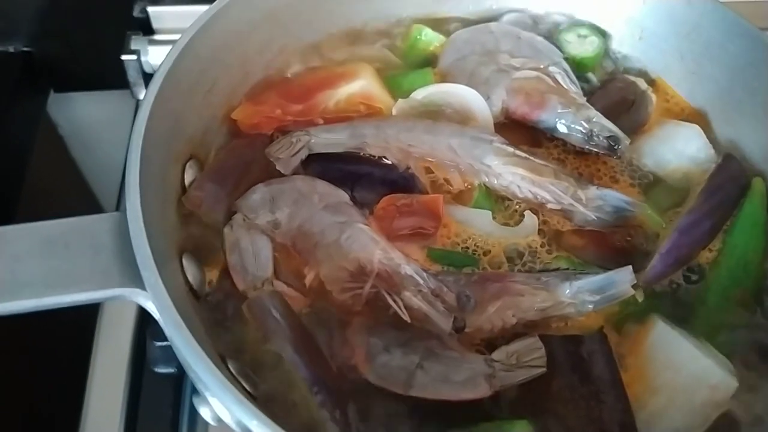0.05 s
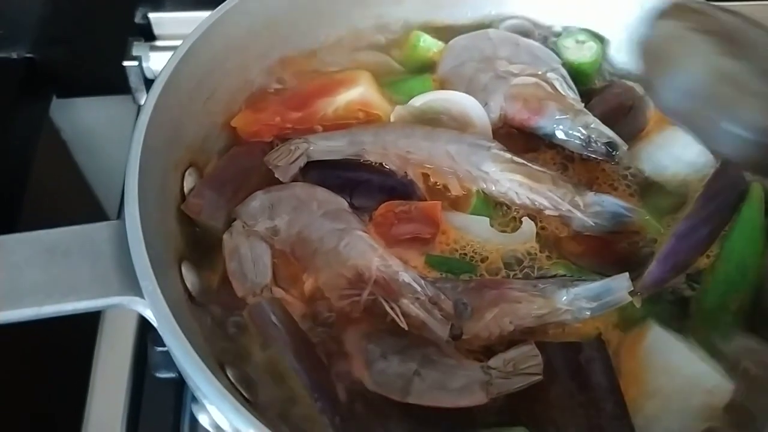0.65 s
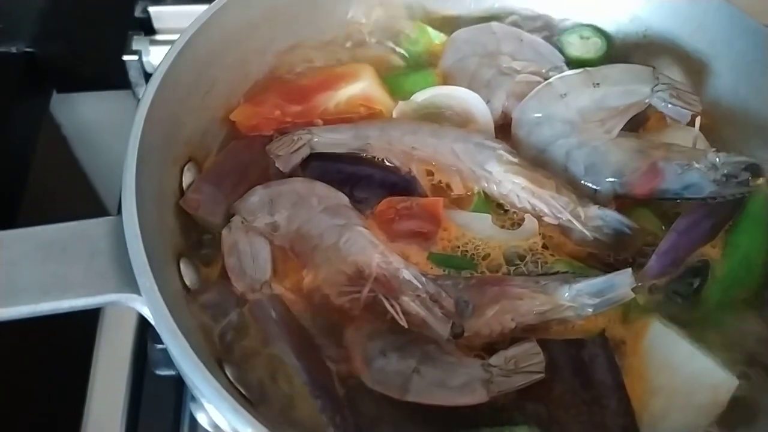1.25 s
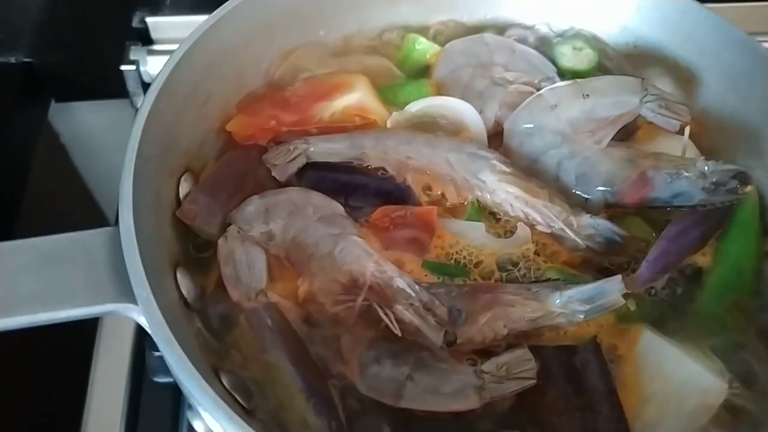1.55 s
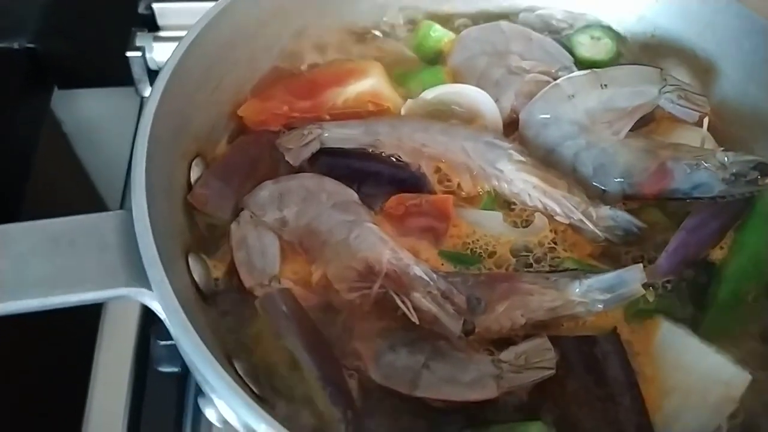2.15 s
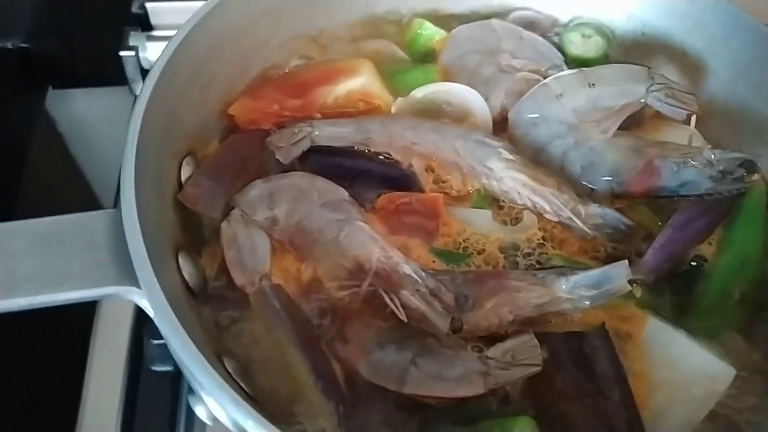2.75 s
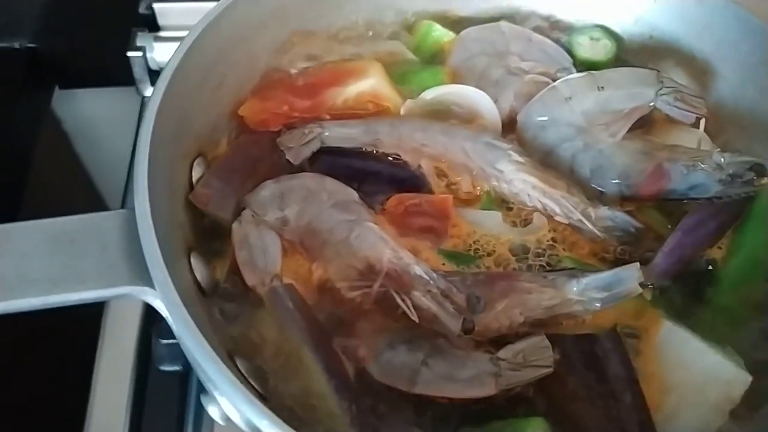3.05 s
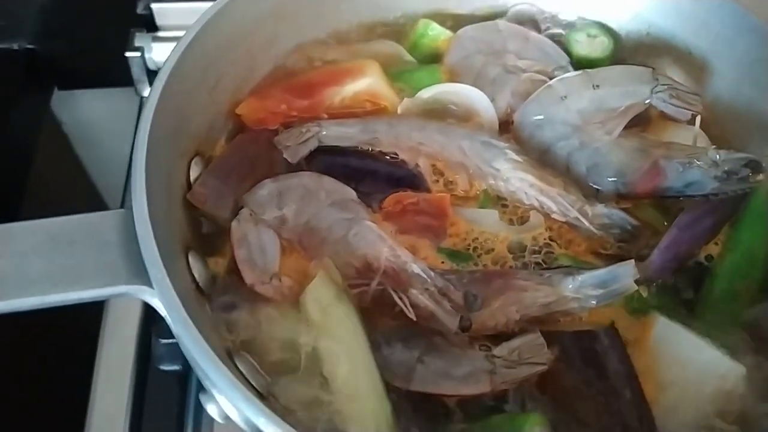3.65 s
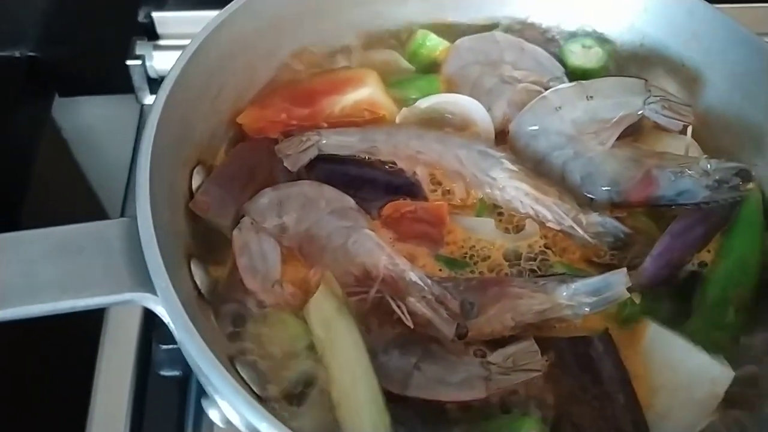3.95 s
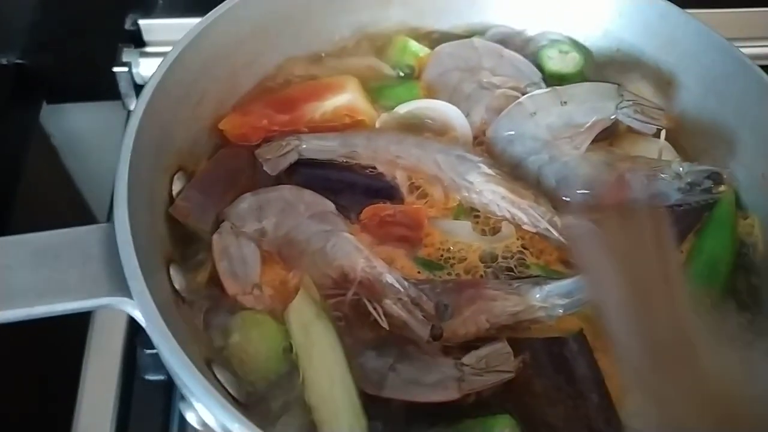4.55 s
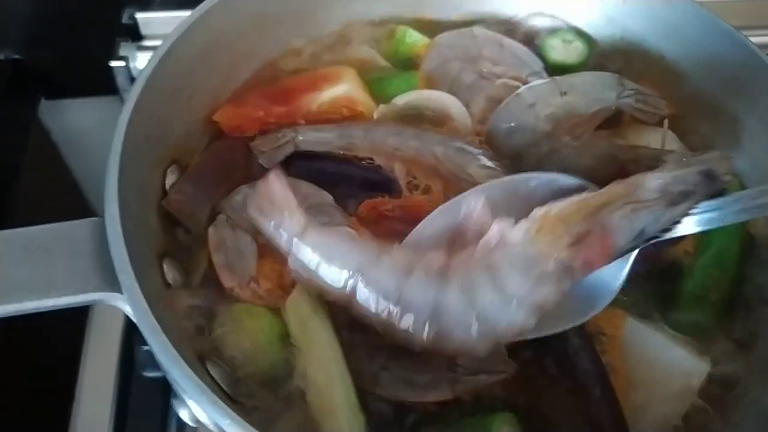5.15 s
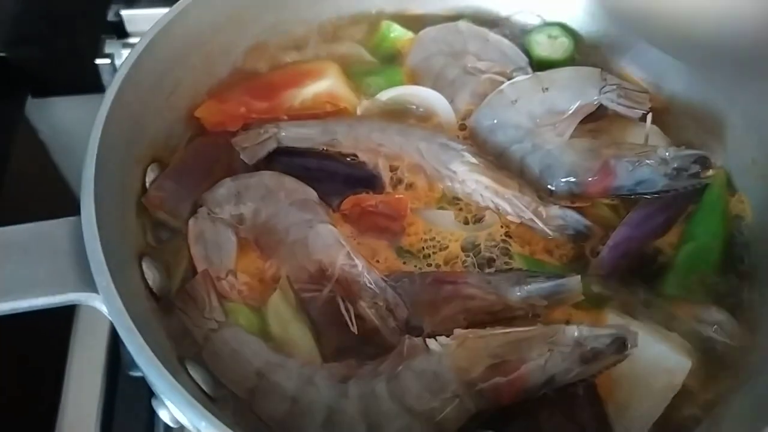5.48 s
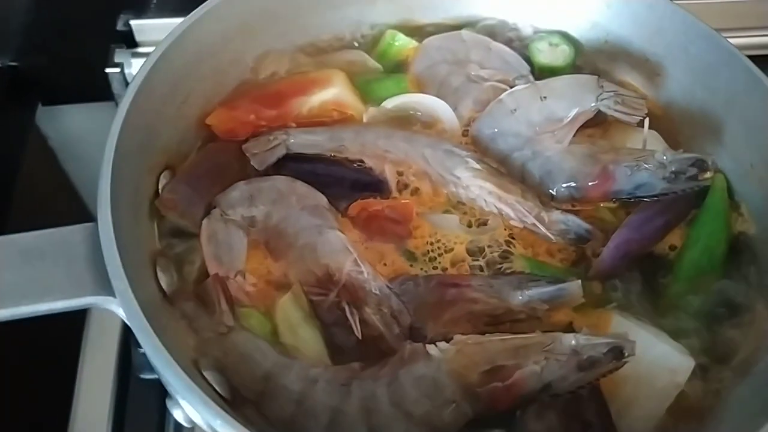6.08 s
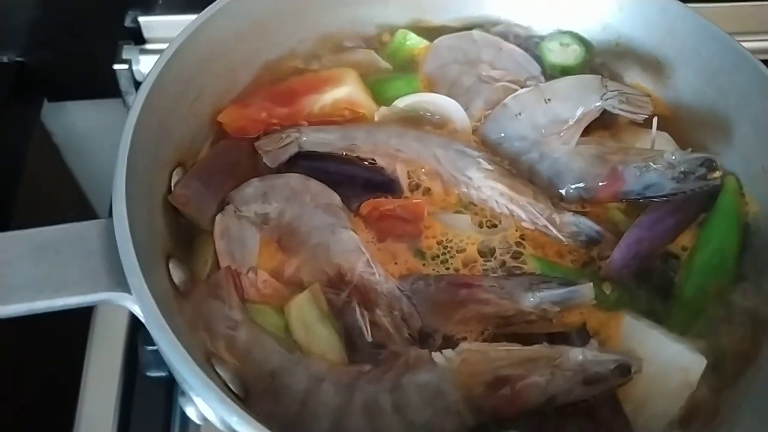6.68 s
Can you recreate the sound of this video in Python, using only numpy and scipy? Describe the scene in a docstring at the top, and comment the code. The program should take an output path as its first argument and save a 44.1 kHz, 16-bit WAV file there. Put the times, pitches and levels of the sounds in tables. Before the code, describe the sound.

Soup simmers and plops in a metal pot while a metal spoon briefly knocks, scrapes and squeaks against it.

```python
"""Soup seethes in a metal pot on a stove, bubbles plopping over a fine fizz of foam.
Each bubble rings as its film tears. A metal spoon scrapes, knocks and squeaks on the pot,
setting the metal ringing, and a small kitchen answers faintly behind the close sound.
The left microphone hears nearly everything; the right is muffled and rumbles in the moving air."""
import sys
import numpy as np
from scipy import signal
from scipy.fft import rfft, irfft, next_fast_len
from scipy.io import wavfile
from scipy.ndimage import uniform_filter1d

SR = 44100
rng = np.random.default_rng(int(sys.argv[2]) if len(sys.argv) > 2 else 0)


def bounce(signal):
    """Save signal as a 16-bit WAV file at the path given by the first command-line argument."""
    frames = np.transpose(np.atleast_2d(signal))
    limited = np.clip(frames, -1, 1)
    pcm = np.round(limited * 32767).astype(np.int16)
    wavfile.write(sys.argv[1], SR, pcm)


N = 305172


def amp(db):
    """Decibels to gain."""
    return 10 ** (np.asarray(db) / 20)


def unit(x):
    """Scales to rms 1."""
    return x / np.sqrt(np.mean(x ** 2) + 1e-20)


def read(points, hz):
    """Reads a table along a log-frequency axis."""
    f, value = np.transpose(points)
    return np.interp(np.log(hz + 1), np.log(f + 1), value)


def add(mix, s, sound):
    """Mixes a sound in at s seconds."""
    part = mix[max(round(s * SR), 0):][:len(sound)]
    part += sound[:len(part)]


def excite(hits, response):
    """Every hit sets off the same response."""
    return signal.oaconvolve(hits, response)[:N]


def colour(x, spectrum):
    """Filters by a table of (Hz, dB)."""
    size = next_fast_len(len(x))
    gain = amp(read(spectrum, np.fft.rfftfreq(size, 1 / SR)))
    return irfft(rfft(x, size) * gain, size)[:len(x)]


def noise(spectrum, size=N):
    """Coloured noise of rms 1."""
    return unit(colour(rng.standard_normal(size), spectrum))


def drift(per_s):
    """Slow random wandering of rms 1."""
    knots = rng.standard_normal(2000)
    return unit(np.interp(np.arange(N) / SR * per_s, np.arange(len(knots)), knots))


def clicks(per_s, spread_db):
    """Random impulses: many small, a few large."""
    chance = rng.random(N) * SR / per_s
    signs = rng.integers(0, 2, N) * 2 - 1
    hit = chance < 1
    out = np.zeros(N)
    out[hit] = signs[hit] * amp(spread_db * np.minimum(-np.log(chance[hit]), 4))
    return out


# The steady bed at the stove. Each row: frequency in Hz, relative density in dB.
SEETHE_SPECTRUM = [(20, 8.5), (100, -7.5), (135, -5.5), (230, 2.5), (340, -9), (530, -11.5), (730, -4.5),
                   (900, -13), (1180, -13.5), (1650, -12), (1870, -8.5), (2050, -18), (3300, -25),
                   (7000, -23.5), (10500, -53), (14000, -44)]
def seethe(level_db=-49, waver_db=1.36):
    """Pot and stove seethe at a gently wavering level."""
    return noise(SEETHE_SPECTRUM) * amp(level_db + waver_db * drift(per_s=15))


# Air at the right microphone. Each row: frequency in Hz, relative density in dB.
DRAUGHT_SPECTRUM = [(10, 1), (22, -2), (45, -7), (100, -21), (125, -27), (170, -31.5), (320, -44),
                    (750, -51.5), (1500, -57), (2700, -59.5), (4000, -65), (8500, -66.5), (15000, -76.5)]
def draught(level_db=-36):
    """Moving air rumbles on the microphone."""
    return amp(level_db) * noise(DRAUGHT_SPECTRUM)


def bubble(hz, cycles, rise):
    """The cavity under a torn film rings a few cycles, rising in pitch as the hole widens."""
    age = np.arange(3000) / SR * hz / cycles
    turns = cycles * (age + rise * (age - 1 + np.exp(-age)))
    wave = np.sin(2 * np.pi * turns) * np.exp(-age) * (1 - np.exp(-age / 0.11))
    return wave / abs(wave).max()


def simmer(level_db=-58, per_s=380, build_db_per_s=0.8):
    """Small, quickly damped bubbles murmur across the surface, louder as the soup heats."""
    pitches = np.geomspace(560, 2300, num=28)
    murmur = np.zeros(N)
    for hz in pitches:
        pops = clicks(per_s / len(pitches), spread_db=2.5)
        murmur += excite(pops, bubble(hz, cycles=2.3, rise=0.085))
    heat_db = build_db_per_s * (np.arange(N) - N / 2) / SR
    tone = [(300, 9.5), (550, -14), (750, -2.5), (1100, 6.5), (1800, -8), (2500, 5.5), (6000, -20)]
    return amp(level_db + heat_db) * unit(colour(murmur, tone))


# Foam at the pot's hot wall. Each row: frequency in Hz, relative density in dB.
FOAM_SPECTRUM = [(2000, -1), (4000, -3.5), (6700, -12), (7100, -1.5), (7600, -4.5), (9000, 2), (10800, 3.5),
                 (12500, -5.5), (14300, -12.5), (15500, -7.5)]
# Droplets on that wall. Each row: start in seconds, relative level in dB.
DROPLET_SPITS = [(0.8032, -41.5), (0.8942, -42.5), (1.3093, -45), (1.839, -42.5), (1.9343, -46),
                 (3.526, -44), (3.549, -44), (3.82, -43), (4.042, -44), (4.114, -45), (5.453, -42),
                 (6.0981, -38)]
def fizz(level_db=-57, clump_db=1.05, spit_db=1, spit_t60=0.03):
    """Foam fizzes in clumps at the hot wall, and now and then spits a droplet."""
    t = np.arange(600) / SR
    foam = unit(colour(clicks(per_s=3500, spread_db=3.2), FOAM_SPECTRUM))
    out = foam * amp(level_db + 0.77 * drift(per_s=8.3) + clump_db * drift(per_s=110))
    for s, db in DROPLET_SPITS:
        add(out, s, amp(db + spit_db - 60 * t / spit_t60) * noise(FOAM_SPECTRUM, len(t)))
    return out


def crackle(level_db=-62, per_s=110):
    """The larger cells of the foam break one by one, each with a tiny high ping."""
    pitches = np.geomspace(7200, 11800, num=10)
    pings = np.zeros(N)
    for hz in pitches:
        breaks = clicks(per_s / len(pitches), spread_db=4)
        pings += excite(breaks, pot_walls(bubble(hz, cycles=2.2, rise=0.048)))
    return amp(level_db) * unit(pings)


def pot_walls(x, echo=0.3, scatter_db=-7.5, t60=0.027):
    """Sound from one place on the soup bounces around the pot and off a surface near it."""
    t = np.arange(3000) / SR
    taps = rng.standard_normal(len(t)) * amp(-60 * t / t60) * (t > .001)
    taps *= amp(scatter_db) / np.linalg.norm(taps)
    taps[0] += 1  # straight to the microphone
    add(taps, rng.uniform(0.00701, 0.0072), [echo])
    return excite(x, taps)


def burst(hz, film_db, snap_db=16, snap_hz=1800, tear_s=.003, trail_db=-16, trail_s=0.012):
    """The wet film tears in three quick snaps, the cavity rings, and two small neighbours follow."""
    sound = bubble(hz, cycles=2.55, rise=0.084)
    snap = amp(film_db + snap_db) * bubble(snap_hz, cycles=1.04, rise=0)
    for k in range(3):
        add(sound, tear_s * k * rng.uniform(0.484, 1) / 2, snap / (1 + k / 2))
    for when, higher in rng.random((2, 2)):
        neighbour = bubble(hz * (1 + higher / 2), cycles=1.4, rise=0.15)
        add(sound, when * trail_s, amp(trail_db) * neighbour)
    wet_lowpass = signal.butter(3, 3300, fs=SR)
    return pot_walls(signal.lfilter(*wet_lowpass, sound))


# Large bubbles on the soup's surface. Each row: start in seconds, relative level in dB,
# nominal pitch in Hz, relative strength of the film's snap in dB.
LARGE_BUBBLES = [(0.083, -45.5, 2800, -15), (0.129, -43, 1140, -17), (0.152, -47, 696, -30),
                 (0.287, -45, 2430, -15), (0.439, -38.5, 1300, -22), (0.61, -47, 1110, -10),
                 (0.622, -45, 820, -23), (0.644, -46.5, 670, -12), (0.664, -47, 660, -22),
                 (0.733, -46.5, 1000, -28), (0.881, -42, 1270, -28), (0.933, -42, 1210, -12.5),
                 (1.113, -40, 1740, -14), (1.3323, -36.5, 1160, -20), (1.526, -43.5, 610, -29),
                 (1.674, -36, 1270, -12), (1.7949, -40.5, 1280, -29), (1.912, -45, 1100, -22),
                 (1.964, -44, 1140, -26), (2.02, -41, 773, -22), (2.164, -42.5, 2370, -25),
                 (2.205, -38.5, 607, -29), (3.031, -38, 1700, -25), (3.062, -38, 1780, -15),
                 (3.2, -44.5, 724, -14), (3.326, -38.5, 1720, -13), (3.363, -42, 716, -10.5),
                 (3.853, -46, 856, -22), (4.012, -35.5, 1110, -32), (4.101, -38.5, 635, -11.5),
                 (4.125, -41, 700, -14), (4.396, -41.5, 850, -35), (4.459, -42, 1340, -23),
                 (4.628, -39.5, 680, -16), (4.774, -40.5, 787, -22), (4.92, -45.5, 1110, -28),
                 (5.066, -44, 1600, -15), (5.073, -37.5, 774, -22), (5.113, -41.5, 1100, -18),
                 (5.128, -38.5, 1180, -27), (5.154, -44, 1700, -22), (5.242, -42.5, 1410, -13.5),
                 (5.32, -34, 1530, -16.5), (5.481, -35, 1040, -16.5), (5.512, -46.5, 1400, -10.5),
                 (5.74, -37.5, 1110, -10), (5.954, -43, 1400, -11), (6.46, -45, 1500, -17),
                 (6.569, -36, 740, -29), (6.799, -42, 1150, -17)]
def plops(level_db=4.5, start_pitch=0.96, lag_s=0.001025):
    """Single large bubbles burst; each starts a little under its pitch and rises through it."""
    out = np.zeros(N)
    for s, db, hz, film_db in LARGE_BUBBLES:
        add(out, s + lag_s, amp(db + level_db) * burst(hz * start_pitch, film_db))
    return out


# Steam down under the food. Each row: start in seconds, peak level in dB, starting pitch in Hz.
STEAM_POCKETS = [(.615, -42, 208), (0.651, -46, 258), (1.53, -47.5, 272), (4.106, -46.5, 218)]
def gulps():
    """Big pockets of steam gulp: deep, slow bubbles with no film to snap."""
    out = np.zeros(N)
    for s, db, hz in STEAM_POCKETS:
        add(out, s, amp(db) * bubble(hz, cycles=7.3, rise=0.12))
    return out


# The metal of spoon and pot. Each row: frequency in Hz, t60 in seconds before t60_factor,
# then relative level in dB when struck at spot 0, at spot 1 and at spot 2.
METAL_MODES = [(162.6, 0.95, -14, -18.5, -30), (212.8, 0.44, -13, -17, -19), (757, 0.12, 8.5, -5, -3),
               (946, 0.069, -8, -14, -3), (1190, 0.045, -12, 1.5, 6.5), (1365, 0.029, -22, -10, 14),
               (1635, 0.067, -3, -7, -6), (1840, 0.057, -10, -14, -6), (2456, 0.061, -15, -9.5, -9.5),
               (2813, 0.079, 2, -40, -36), (3000, 0.065, -40, 2.5, -40), (3200, 0.19, -45, -37, -13.5),
               (3850, 0.065, -10, -3, -32), (4030, 0.089, -7, -18, -10), (4200, 0.037, 2, -3, -30),
               (4867, 0.059, -13, 4, -15), (5310, 0.065, -7, -1, -17), (5600, .07, -16, -5, -28),
               (6050, 0.049, 1, 10, -18), (6240, 0.14, -35, -16, -17), (6500, 0.08, -7, -1, -10),
               (7220, 0.036, 3.5, 10.5, -22), (7450, 0.044, -2, 6, -16), (7760, 0.052, 7.5, 8.5, -14),
               (8295, 0.062, 8, 9.5, 7.5), (8500, 0.089, -1, 10, -22), (8600, .06, 8, -2, -14),
               (8800, 0.09, -10, 7, 4), (9170, 0.063, 13, 6.5, -14), (9390, 0.053, 4, 11, 5),
               (9770, 0.12, 4, -2, -1), (10120, 0.13, -5, 0, -1), (10370, 0.098, -9, 3, -9),
               (10700, 0.15, -1, 0, -0.5), (11300, 0.11, -4, -11, -17)]
def ring(spot, t60_factor=0.89, blur=0.0047, swell_cycles=5.2):
    """Each mode swells over a few cycles and dies; the chattering contact blurs its pitch."""
    t = np.arange(SR // 3) / SR
    out = np.zeros(len(t))
    for hz, t60, *spot_db in METAL_MODES:
        chatter = unit(uniform_filter1d(rng.standard_normal(len(t)), size=120))
        turns = np.cumsum(hz * (1 + blur * chatter)) / SR + rng.random()
        swell = 1 - np.exp(-t * hz / swell_cycles)
        decay = amp(spot_db[spot] - 60 * t / (t60 * t60_factor))
        out += swell * decay * np.sin(2 * np.pi * turns)
    return out


def stroke(start, length, db, press_share=0.14, lift_share=0.25, ease_db=6.5):
    """The spoon presses in, eases off as it slides, and lifts."""
    along = np.clip((np.arange(N) / SR - start) / length, 0, 1)
    contact = np.minimum(along / press_share, (1 - along) / lift_share)
    return amp(db - ease_db * along) * np.minimum(1, contact)


# The spoon's edge, then its back, on the pot. Each row: frequency in Hz, relative density in dB.
EDGE_SPECTRUM = [(300, -38), (800, -12), (2000, -27), (3500, -45), (6500, -7), (8500, 2.5), (11000, -1.5),
                 (13000, -13.5), (16000, -33)]
BACK_SPECTRUM = [(300, -17), (1500, -2), (2800, -5), (4000, 1), (5500, 3), (7500, -10.5), (11000, -25),
                 (16000, -38)]
# Strokes across the pot. Each row: start and length in seconds, relative level in dB,
# tilt from 0 (on the spoon's edge) to 1 (flat on its back).
SPOON_STROKES = [(1.43, 0.18, -57, 1), (2.365, 0.12, -38, 0.11), (2.444, 0.065, -40.5, 0.13),
                 (2.571, 0.1, -34, 0.088), (2.663, 0.19, -40, 0.15), (2.82, 0.27, -50.5, 0.84),
                 (3.02, 0.21, -54.5, .95), (3.185, 0.14, -48, 0.05), (4.04, 0.21, -57.5, 0.92),
                 (6.43, 0.098, -43, 0.089), (6.515, 0.058, -37.5, 0.03), (6.55, 0.12, -52.5, 0.46),
                 (6.68, 0.056, -54, 0.13)]
def scrapes(level_db=0.7, ring_db=-4, judder_db=2, mode_t60=0.022, flare_db=8):
    """Tiny slips ring the crowded modes: bright on the spoon's edge, dull on its back."""
    age = np.arange(900) / SR
    pressure = np.array([stroke(start, length, db) for start, length, db, _ in SPOON_STROKES])
    flat = np.array([tilt for *_, tilt in SPOON_STROKES])
    grit = unit(clicks(per_s=900, spread_db=2.6))
    slips = grit * amp(judder_db * drift(per_s=140))
    # the contact wanders over the metal, so one mode after another flares up and fades
    body = np.zeros(N)
    for hz in np.linspace(800, 13500, num=30) + rng.uniform(-200, 200, 30):
        mode = np.sin(2 * np.pi * hz * age) * amp(-60 * age / mode_t60)
        body += excite(slips, mode) * amp(flare_db * np.tanh(drift(per_s=55)))
    metal = excite(slips, ring(0) + ring(1))
    tone = [(700, 1), (1200, 11.5), (2000, 8), (3000, -5), (5500, -6), (8300, 2.5), (10500, 8.5)]
    edge = unit(colour(body, EDGE_SPECTRUM)) + amp(ring_db) * unit(colour(metal, tone))
    back = noise(BACK_SPECTRUM)
    return amp(level_db) * (np.sqrt(1 - flat) @ pressure * edge + np.sqrt(flat) @ pressure * back)


# The pot's crowded, well damped modes, one list for each contact spot.
# Each row: frequency in Hz, relative density in dB.
CLATTER_SPECTRA = [
    [(100, -37), (700, -8), (1500, -16.5), (2300, -23), (3400, -17), (4000, -14), (5500, -10.5),
     (6900, -12), (7700, -1.5), (9000, -12), (11500, -9), (16000, -38)],
    [(100, -57), (700, -1), (1600, -19.5), (2100, -22), (3400, -29), (4300, -6.5), (6600, -11),
     (8300, -12.5), (10700, -6), (13000, -18), (16000, -44)],
    [(100, -30), (500, -9), (1250, -0.5), (2100, -11.5), (3500, -18), (5000, -14), (6800, -14.5), (8200, 2),
     (10500, -2), (13000, -16), (16000, -36)],
]
# Blows of the spoon on the pot. Each row: start in seconds, strength in dB, contact spot 0-2,
# t60 of the clatter in seconds, relative level of the ring in dB.
SPOON_BLOWS = [(2.3014, -19, 0, 0.026, -6.5), (2.3504, -27, 0, 0.043, -8), (2.359, -35.5, 0, 0.035, -7.5),
               (2.459, -38.5, 0, 0.066, -12), (2.5496, -34.5, 0, 0.065, -6), (6.375, -19, 1, 0.042, -7),
               (6.3793, -21, 1, 0.032, -3.5), (6.419, -34, 1, 0.06, -6), (6.8213, -15.5, 2, 0.042, -3.5),
               (6.8275, -20.5, 2, 0.052, -14)]
def knocks(clatter_db=5, attack_s=0.00015, shimmer_db=-22, shimmer_t60=0.3,
           shudder_db=-29, shudder_t60=0.97):
    """Each blow: clatter, a quickly damped ring, a faint shimmer, the pot shuddering on its grate."""
    out = np.zeros(N)
    t = np.arange(SR // 3) / SR
    attack = 1 - np.exp(-t / attack_s)
    grate = [(110, -47), (150, -1.5), (185, -8.5), (260, -15), (500, -20.5), (2000, -56)]
    for s, db, spot, t60, ring_db in SPOON_BLOWS:
        clatter = noise(CLATTER_SPECTRA[spot], len(t)) * amp(clatter_db - 60 * t / t60)
        shimmer = noise(EDGE_SPECTRUM, len(t)) * amp(shimmer_db - 60 * t / shimmer_t60)
        shudder = noise(grate, len(t)) * amp(shudder_db - 60 * t / shudder_t60)
        add(out, s, amp(db) * attack * (clatter + shimmer + shudder + amp(ring_db) * ring(spot)))
    return out


# The sliding spoon catches on the pot. Each row: start and length in seconds, pitch in Hz, level in dB.
SPOON_SQUEAKS = [(2.579, 0.035, 4720, -48), (2.581, 0.03, 6640, -43), (2.594, .04, 8250, -41),
                 (2.609, 0.042, 5160, -50), (2.611, 0.033, 9500, -42), (2.672, 0.036, 1880, -45.5),
                 (2.708, .04, 6420, -54), (4.106, 0.014, 6220, -49), (6.513, 0.045, 4760, -46)]
def squeaks(waver=0.0027, rough_db=3):
    """Stick and slip lock briefly onto one rough, unsteady pitch."""
    out = np.zeros(N)
    for s, length, hz, db in SPOON_SQUEAKS:
        size = round(length * SR)
        pitch = hz * (1 + waver * drift(per_s=560)[:size])
        roughness = amp(rough_db * drift(per_s=640)[:size])
        tone = unit(np.sin(2 * np.pi * np.cumsum(pitch) / SR) * roughness)
        add(out, s, amp(db) * tone * signal.windows.tukey(size, .5))
    return out


# The small room around the stove. Each row: frequency in Hz, t60 in seconds.
KITCHEN_DECAY = [(150, 0.71), (800, 0.29), (3000, 0.32), (9000, 0.47), (15000, 0.19)]
def kitchen(x, delay_s=.006):
    """The nearby walls return a short diffuse tail, each band dying at its own speed."""
    hz, t, bands = signal.stft(rng.standard_normal(SR // 2), SR, nperseg=256)
    decay = amp(-60 * t / read(KITCHEN_DECAY, hz)[:, None]) * (t > delay_s)
    _, tail = signal.istft(bands * decay, SR, nperseg=256)
    return excite(x, tail / np.linalg.norm(tail))


# The muffled microphone on the right. Each row: frequency in Hz, gain in dB.
RIGHT_MIC_RESPONSE = [(100, -23), (760, -30.5), (2000, -41), (5000, -43), (9000, -55), (12000, -44),
                      (15000, -63)]
def scene(soup_room_db=-13, spoon_room_db=-15):
    """Soup and spoon close by, at an open left microphone and a muffled right one."""
    soup = plops() + gulps() + simmer() + fizz() + crackle()
    spoon = knocks() + scrapes() + squeaks()
    left = soup + spoon + seethe() + kitchen(amp(soup_room_db) * soup + amp(spoon_room_db) * spoon)
    right = colour(left, RIGHT_MIC_RESPONSE) + draught()
    return np.array([left, right])


def record(dry, ceiling=0.66, cutoff_hz=15800):
    """The recorder rounds off the sharpest peaks, then cuts the highest treble."""
    rounded = ceiling * np.tanh(dry / ceiling)
    lowpass = signal.firwin(511, cutoff_hz, window=("kaiser", 9), fs=SR)
    return signal.oaconvolve(rounded, lowpass[None], "same")


dry = scene()
out = record(dry)
bounce(out)
```